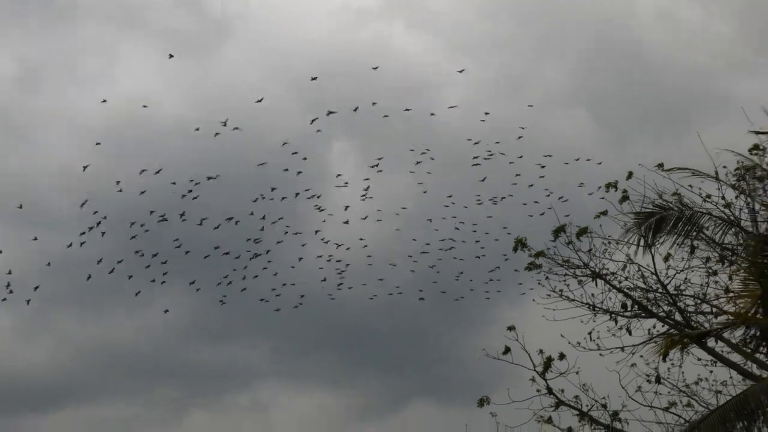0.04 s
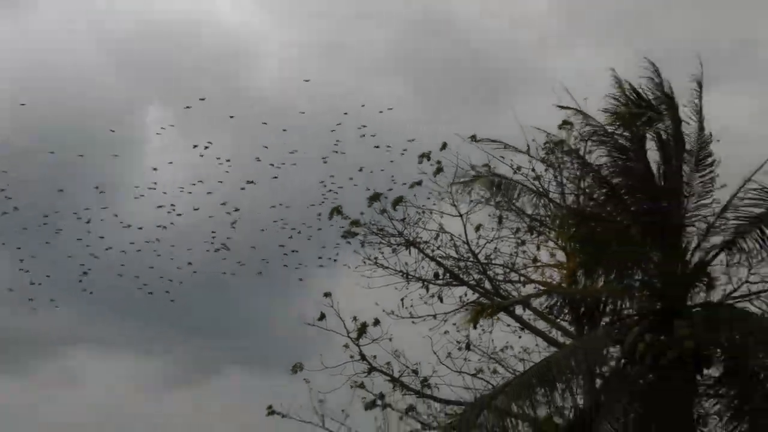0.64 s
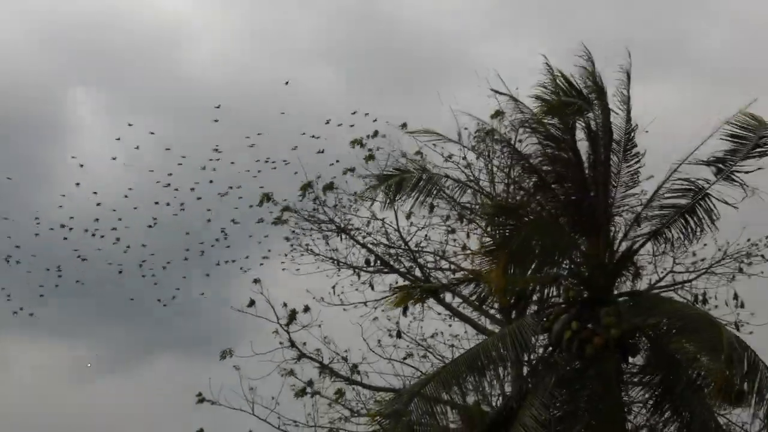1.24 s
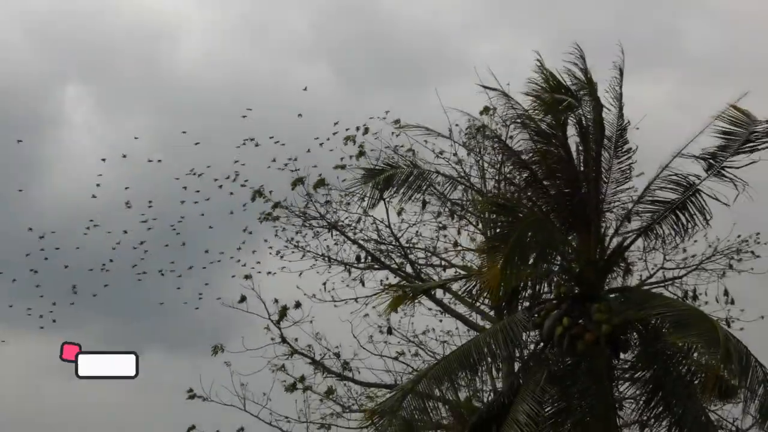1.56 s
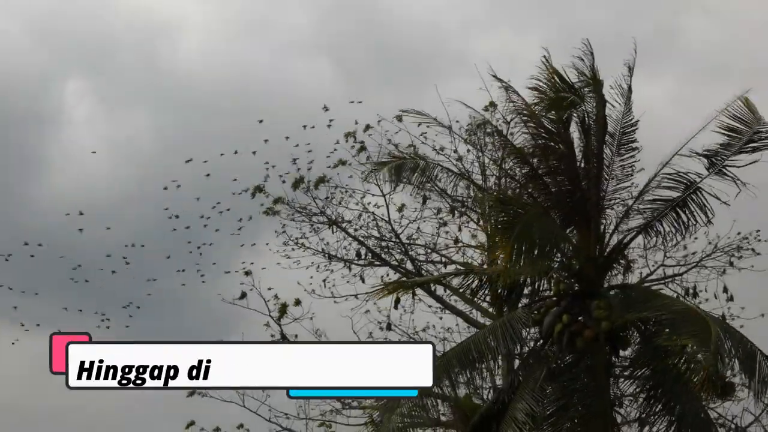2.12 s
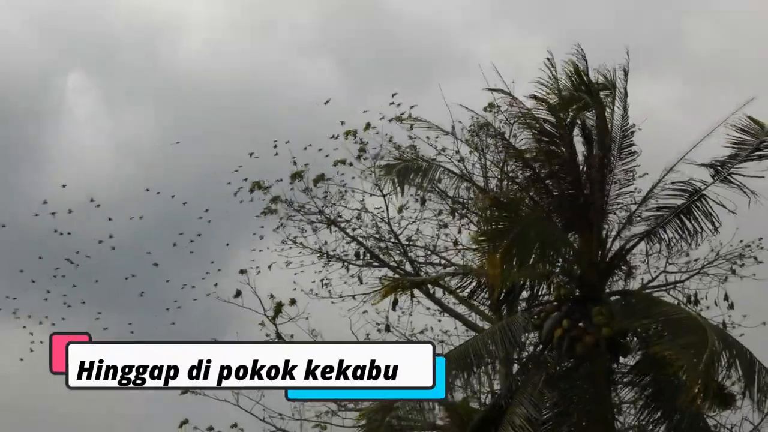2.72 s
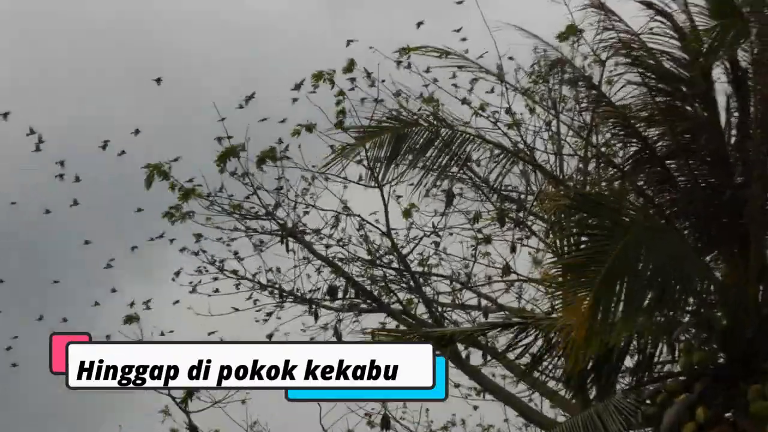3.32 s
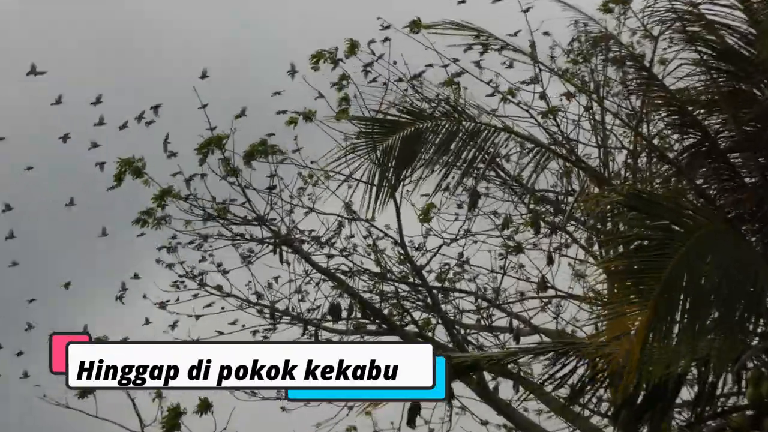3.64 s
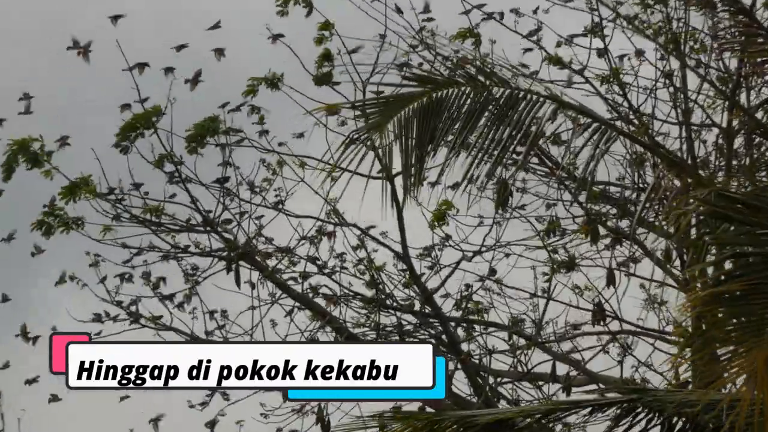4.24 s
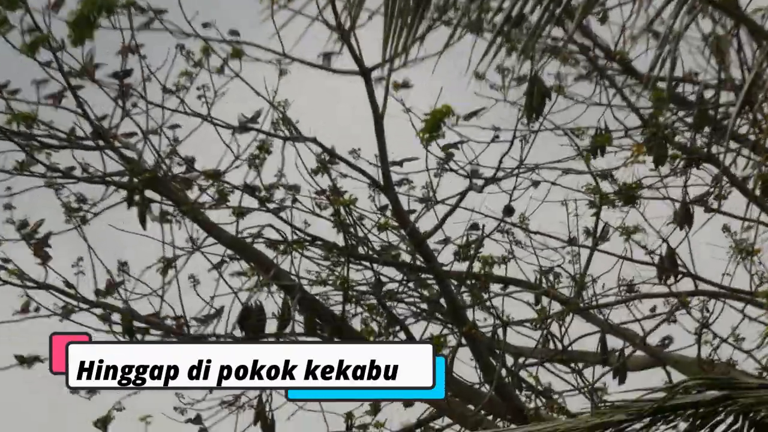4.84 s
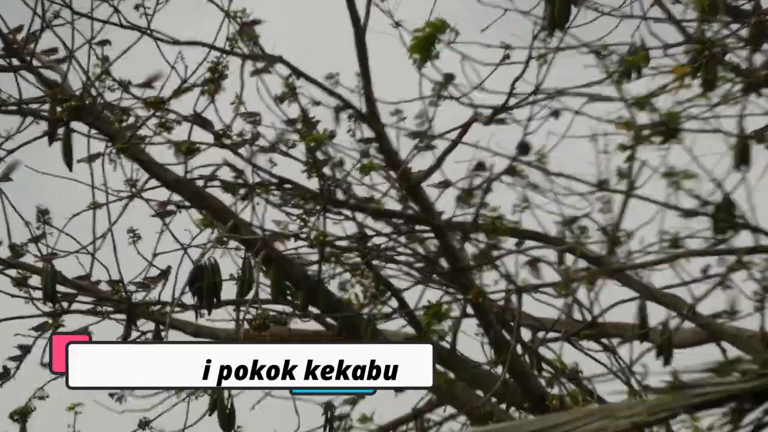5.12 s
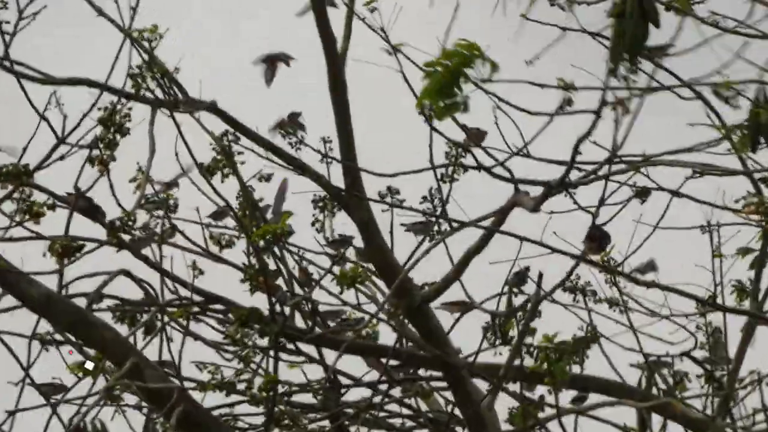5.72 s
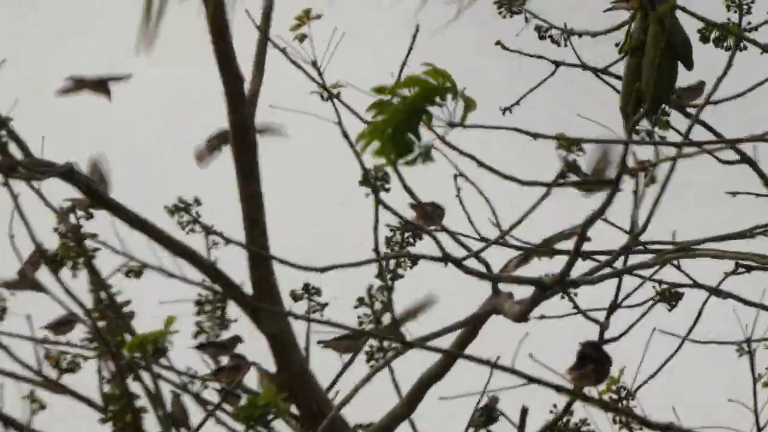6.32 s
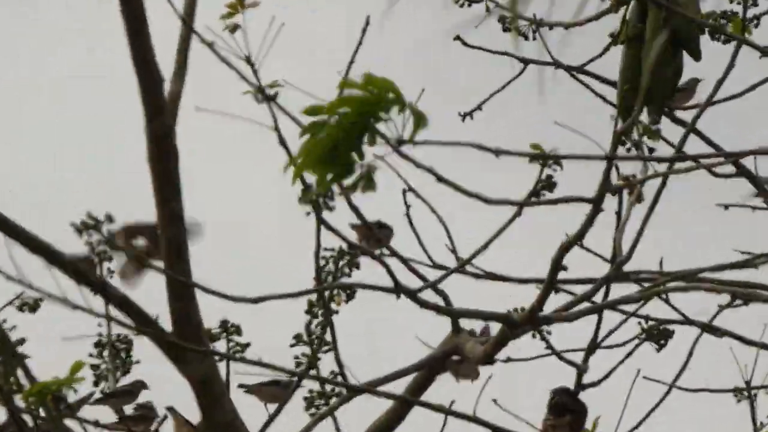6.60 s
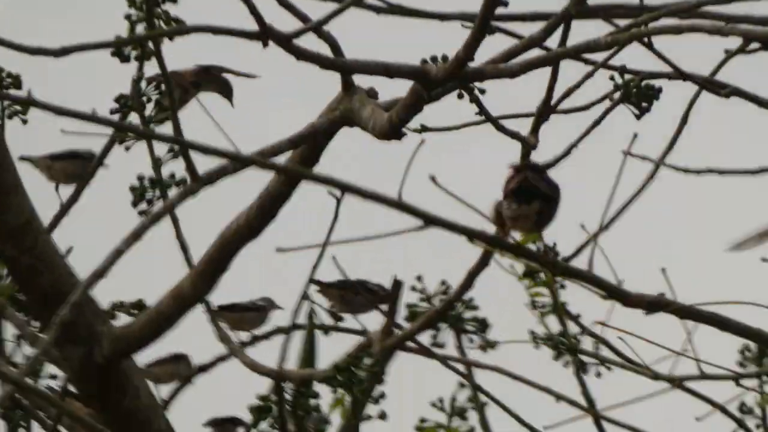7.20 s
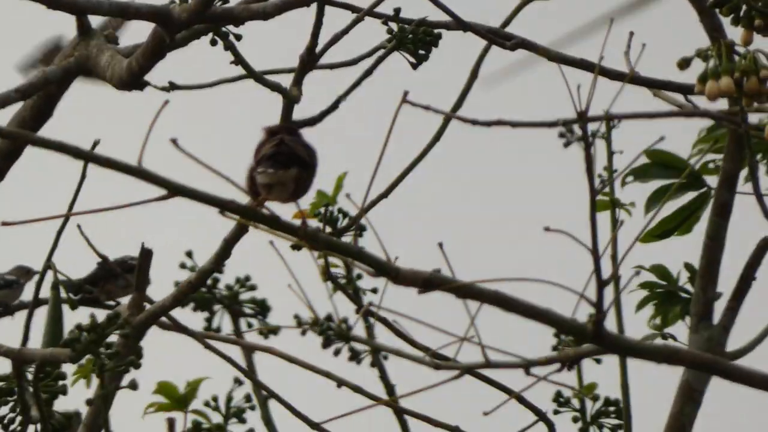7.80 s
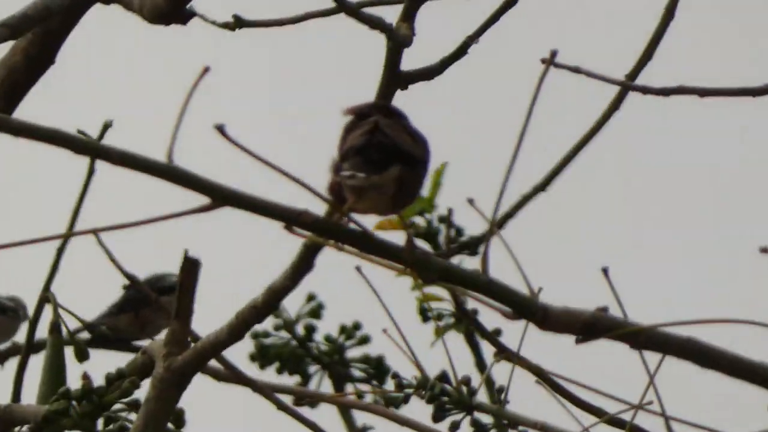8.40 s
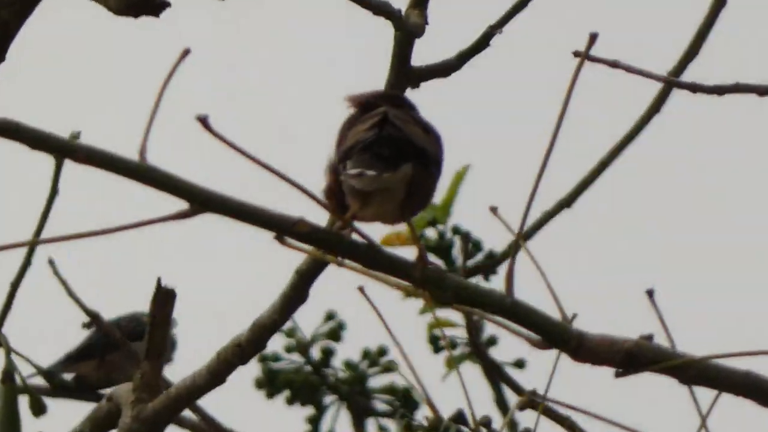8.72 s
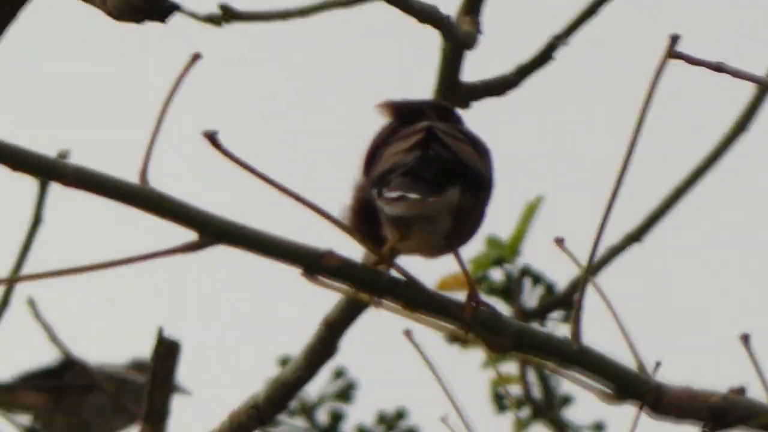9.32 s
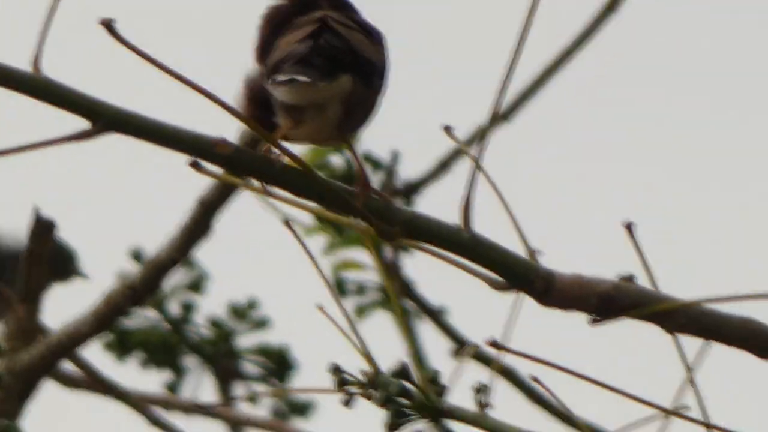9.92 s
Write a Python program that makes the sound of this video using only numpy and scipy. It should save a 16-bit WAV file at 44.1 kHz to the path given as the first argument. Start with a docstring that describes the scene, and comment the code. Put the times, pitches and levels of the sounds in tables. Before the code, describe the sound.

Gusty wind thumps on the microphone while a flock of small birds chatters in a tree, and a zoom motor whirs and ticks.

```python
"""Flock in a windy tree

Small birds settle in a tall tree on a gusty day, heard from below on a zooming camera's stereo microphone.
Crowns roar and leaves hiss; hundreds of birds chatter in gliding whistles, a few of them close.
Eddies thump on the diaphragm and duck the recorder's gain. The lens motor whirs and ticks,
and the stereo image narrows as it zooms in."""
import sys
import numpy as np
from scipy import signal
from scipy.fft import rfft, irfft, next_fast_len
from scipy.io import wavfile
from scipy.ndimage import uniform_filter1d

SR = 44100
rng = np.random.default_rng(int(sys.argv[2]) if len(sys.argv) > 2 else 0)


def dump_mix(stems):
    """Bounce the given channels to the path in sys.argv[1] as a 16-bit WAV at rate SR."""
    frames = np.atleast_2d(stems).T  # one column per channel
    limited = np.clip(frames, -1, 1)  # hard clip at full scale
    pcm = np.round(limited * 32767).astype(np.int16)
    wavfile.write(sys.argv[1], SR, pcm)


N = 438794
TIME = np.arange(N) / SR


def gain_of(db):
    """Decibels to amplitude."""
    return 10 ** (np.asarray(db) / 20)


def unit_rms(x):
    """Scales to rms 1."""
    return x / np.sqrt(np.mean(x ** 2) + 1e-20)


def steadied(x, size):
    """Removes swells slower than `size` samples."""
    return x / np.sqrt(uniform_filter1d(x ** 2, size) + 1e-6)


def curve(rows):
    """Rows of (time [s], value), read at every sample."""
    return np.interp(TIME, *np.transpose(rows))


def coloured(x, points):
    """Filters x by rows of (frequency [Hz], gain [dB])."""
    hz, db = np.transpose(points)
    size = next_fast_len(N)
    bins = np.fft.rfftfreq(size, 1 / SR)
    response = gain_of(np.interp(np.log(bins + 1), np.log(hz), db))
    return irfft(rfft(x, size) * response, size)[:N]


def noise(points):
    """Steady noise of rms 1 with the given spectrum."""
    return unit_rms(coloured(rng.standard_normal(N), points))


def wander(rate, size=N):
    """A random drift of rms about 1 that turns `rate` times a second."""
    knots = rng.standard_normal(size // 16 + 8)
    return np.interp(np.arange(size) * rate / SR, np.arange(len(knots)), knots) * np.sqrt(3 / 2)


def burst(length, rise_s, fall_s):
    """An envelope that swells, holds and dies away."""
    t = np.arange(0, length + 8 * fall_s, 1 / SR)
    return np.minimum(t / rise_s, 1) * np.exp(-np.maximum(t - length, 0) / fall_s)


def add(mix, start, sound):
    """Mixes a sound in at `start` seconds."""
    part = mix[max(round(start * SR), 0):][:len(sound)]
    part += sound[:len(part)]


def echoes(x, t60):
    """Scatter from trunks and branches: a short random tail of energy 1."""
    t = np.arange(SR // 2) / SR
    tail = rng.standard_normal(len(t)) * gain_of(-60 * t / t60) * (t > .006)
    return signal.oaconvolve(x, tail / np.linalg.norm(tail))[:N]


# the microphone's side signal as the lens zooms in: (time [s], gain [dB])
SIDE_GAIN = [(0, -0.5), (3, 1.5), (5, -2), (6.3, -3.5), (7.3, -10.5)]
# the part of the side that narrows, and the treble that stays wide: (frequency [Hz], gain [dB])
NARROWING_BAND = [(60, -17), (150, -14.5), (400, -8.5), (1500, -5.5), (3200, -11.5)]
WIDE_TREBLE = [(3500, -63), (6000, -30), (9500, -10.5), (13000, -3)]

def stereo(mid, side):
    """The zoom microphone lets in less of the side as the lens closes in; the top stays wide."""
    side = coloured(side, NARROWING_BAND) * gain_of(curve(SIDE_GAIN)) + coloured(side, WIDE_TREBLE)
    return np.array([mid + side, mid - side])


# wind in the crowns, high overhead: (frequency [Hz], level [dB])
ROAR_SPECTRUM = [(20, -67), (60, -4), (130, 6), (220, 2), (330, 5.5), (520, -1.5), (700, -1.5),
                 (1050, -5.5), (1500, -5.5), (2500, -7), (3200, -12.5), (6000, -50)]
# its midrange at the microphone: (time [s], level [dB])
ROAR_LEVEL = [(0, -36), (0.55, -37.5), (0.75, -34.5), (1.15, -34.5), (1.4, -39), (1.8, -40), (2.0, -37.5),
              (2.5, -41), (3.3, -39.5), (5.05, -39.5), (5.5, -45.5), (5.95, -50), (7.4, -52), (8.85, -39),
              (9.95, -38.5)]
# a palm frond caught by one gust: (time [s], depth [0-1])
FROND_RATTLE = [(.7, 0.36), (.85, 0.8), (1.15, 0.7), (1.25, 0)]

def crowns(lull_db=-44, rattle_hz=65):
    """Wind roars through the crowns, duller in the lulls; a flapping frond chops it into a rattle."""
    roar, level_db = noise(ROAR_SPECTRUM), curve(ROAR_LEVEL)
    midrange = signal.butter(4, [700, 1500], "band", fs=SR, output="sos")
    swirl_db = 2.5 * np.tanh(wander(30))
    roar = roar / np.std(signal.sosfilt(midrange, roar)) * gain_of(level_db - 1 + swirl_db)
    brightness = gain_of(np.minimum(level_db - lull_db, 0))
    roar -= (1 - brightness) * coloured(roar, [(700, -38), (1300, -0.5)])
    flaps = np.cos(2 * np.pi * np.cumsum(rattle_hz * (1 + 0.179 * wander(25.15))) / SR)
    frond = coloured(roar, [(400, -22), (600, 14.5), (950, 4), (1400, -12)])
    return roar + curve(FROND_RATTLE) * flaps * frond


# foliage overhead: (frequency [Hz], level [dB])
LEAF_SPECTRUM = [(800, -58), (2200, -11), (3000, -2.5), (4200, 4), (5300, 1.5), (6300, -2.5), (7900, -12),
                 (9000, -8.3), (10100, -7.5), (11500, -15), (15300, -28)]
# its hiss at the microphone: (time [s], level [dB])
LEAF_LEVEL = [(0, -40), (0.2, -37), (0.5, -42.5), (1.15, -39.5), (1.7, -44.5), (2.0, -40.5), (2.5, -43.5),
              (5.0, -41), (5.9, -47.5), (7.2, -48.5), (7.8, -43), (8.8, -36), (9.95, -36)]

def leaves(snaps_per_s=900):
    """Leaves hiss and patter against each other in tiny snaps."""
    sizes = gain_of(14 * np.minimum(rng.exponential(1, N), 3.5))
    snaps = (rng.random(N) < snaps_per_s / SR) * rng.choice([-1, 1], N) * sizes
    hiss = noise(LEAF_SPECTRUM) + gain_of(-10) * unit_rms(coloured(snaps, LEAF_SPECTRUM))
    return hiss * gain_of(curve(LEAF_LEVEL) + 4 + 0.9 * wander(40))


# brief swells of broad background hiss: (start [s], length [s], level [dB])
HISS_SWELLS = [(2.632, 0.086, -33.5), (5.612, 0.14, -46), (6.17, 0.1, -44), (6.38, 0.15, -41.5),
               (6.76, 0.086, -41.5), (9.43, 0.049, -33.5)]
# their colour: (frequency [Hz], level [dB])
SWELL_SPECTRUM = [(250, -22), (420, -7), (1400, 2.5), (2300, 0.5), (3200, 4.5), (5000, -0.5), (8000, -14.5),
                  (10000, -10), (15000, -33)]

def hiss_swells():
    """Short swells of broad hiss that start crisply and flutter."""
    envelope = np.zeros(N)
    for start, length, db in HISS_SWELLS:
        add(envelope, start, gain_of(db) * burst(length, rise_s=0.0072, fall_s=0.021))
    return envelope * noise(SWELL_SPECTRUM) * gain_of(2 * wander(60))


# the lens motor, right beside the microphone: (frequency [Hz], level [dB])
WHIR_SPECTRUM = [(360, -9), (415, 14.5), (480, -20), (1450, -22), (1700, 3.5), (1790, 5), (2050, -25)]
# its run: (time [s], level [dB])
WHIR_LEVEL = [(2.6, -69), (2.9, -46), (5.2, -52), (5.9, -59), (6.4, -45.5), (7.3, -58.5), (7.8, -48),
              (8.4, -46)]
# its single steps: (time [s], level [dB])
LENS_TICKS = [(7.885, -27), (7.92, -28), (7.95, -26.5), (7.9902, -24), (8.0167, -26), (8.1993, -25),
              (8.2387, -25), (8.4622, -22.5), (8.601, -21.5), (8.728, -19), (8.866, -22), (8.996, -22),
              (9.133, -21.5), (9.2624, -22), (9.4727, -17.5), (9.543, -24), (9.6617, -21), (9.7337, -20.5),
              (9.796, -21), (9.935, -21)]

def lens_motor(tick_hz=1735, rise_s=0.0033, ring_s=0.04):
    """The motor whirs, then steps in ticks, each a short note with a dull clack."""
    out = noise(WHIR_SPECTRUM) * gain_of(curve(WHIR_LEVEL) + 3.3 * wander(15))
    t = np.arange(SR // 8) / SR
    swell = (t / rise_s * np.exp(1 - t / rise_s)) ** 2
    ring = gain_of(-16) * np.minimum(t / rise_s, 1) * np.exp(-t / ring_s)
    for start, db in LENS_TICKS:
        rattle = ring * wander(106, size=len(t))  # the gears rattle on faintly, on the same note
        hz = tick_hz * (1 + .01 * rng.standard_normal())
        note = (swell + rattle) * np.sin(2 * np.pi * hz * t)
        clack = swell * unit_rms(uniform_filter1d(rng.standard_normal(len(t)), size=9))
        add(out, start, gain_of(db - 4.8) * (note + gain_of(-15) * clack))
    return out


# handling noise on the camera: (time [s], level [dB], fade [s], pitch [Hz])
KNOCKS = [(1.148, -23, 0.0055, 4030), (2.715, -29, 0.014, 3060), (5.308, -19, 0.005, 7500),
          (5.308, -22.5, 0.012, 740), (5.384, -27.5, 0.0076, 5900), (5.63, -28.5, 0.014, 900),
          (7.655, -26, 0.004, 6300), (9.477, -21, 0.003, 1200), (9.74, -16.5, 0.015, 625),
          (9.741, -16.5, 0.0086, 4370)]

def handling():
    """The hand knocks and creaks on the body: bands of noise that die quickly."""
    out, t = np.zeros(N), np.arange(SR // 8) / SR
    for start, db, fade, hz in KNOCKS:
        body = signal.butter(2, [hz / 2.74, min(hz * 1.04, SR / 2.1)], "band", fs=SR, output="sos")
        knock = unit_rms(signal.sosfilt(body, rng.standard_normal(len(t))))
        add(out, start, gain_of(db) * knock * np.exp(-t / fade))
    return out


def eddy(hz, cycles):
    """One eddy pushes the diaphragm to and fro; 50 ms long, strongest in the middle."""
    t = np.arange(-SR // 40, SR // 40) / SR
    push = np.cos(2 * np.pi * (hz * t + rng.random()))
    return push / np.cosh(t * hz / cycles) * signal.windows.tukey(len(t))


# gusts straight on the microphone: (start [s], length [s], level [dB], typical eddy pitch [Hz])
GUSTS = [(0.038, 0.18, -19, 164), (0.281, 0.033, -10, 223), (0.338, 0.18, -16, 231),
         (0.809, 0.11, -17, 217), (0.991, 0.024, -13, 190), (1.09, 0.19, -17.5, 170),
         (1.264, 0.24, -14, 230), (1.513, 0.15, -14, 236), (1.964, 0.1, -15.5, 163),
         (2.083, 0.042, -8.5, 232), (2.892, 0.089, -14, 200), (3.293, 0.042, -22, 185),
         (3.613, 0.055, -14.5, 176), (3.694, 0.27, -25, 189), (4.086, 0.12, -16.5, 177),
         (4.358, 0.19, -20.5, 186), (5.058, 0.055, -16, 196), (5.167, 0.062, -16.5, 242),
         (5.49, 0.13, -21.5, 204), (5.764, 0.097, -17.5, 245), (6.037, 0.025, -18.5, 188),
         (6.124, 0.019, -16, 198), (6.232, 0.067, -24, 231), (6.381, 0.17, -23, 220),
         (6.573, 0.086, -23.5, 233), (6.825, 0.023, -19, 183)]
# the lighter flow between them: (time [s], level [dB])
BREEZE = [(0, -33), (0.45, -15), (0.6, -37), (0.78, -25), (1.75, -25), (1.87, -42), (2.5, -58), (2.8, -37),
          (3.02, -17), (3.17, -39.5), (4.3, -24), (4.8, -39.5), (5.6, -24.5), (6.5, -29.5), (7.1, -35.5),
          (7.5, -36), (7.9, -51), (9.9, -64)]
# the rumble under the eddies: (frequency [Hz], level [dB])
RUMBLE_SPECTRUM = [(35, -67), (62, -6), (90, -3.5), (130, 5), (190, -1.5), (270, -7), (420, -7), (580, -36),
                   (2000, -77)]

def buffeting(level_db, edge_db, pitch_ratio=0.98, count=2600):
    """Eddies of many sizes rock the diaphragm; harder gusts add a brighter, rougher edge."""
    power = gain_of(curve(BREEZE)) ** 2
    for start, length, db, _ in GUSTS:
        add(power, start, (gain_of(db) * burst(length, rise_s=0.014, fall_s=0.027)) ** 2)
    force = np.sqrt(power)
    eddy_hz = pitch_ratio * curve([(start + length / 2, hz) for start, length, _, hz in GUSTS])
    flow = np.zeros(N)
    for when, pitch, strength in zip(rng.integers(0, N, count), *rng.standard_normal((2, count))):
        speed = np.clip(10 * force[when], .2, 2) ** 0.074  # faster air, quicker eddies
        hz = eddy_hz[when] * speed * 2 ** (0.48 * np.clip(pitch, -2, 2))
        add(flow, when / SR, gain_of(5 * min(strength, 2)) * eddy(hz, cycles=0.67))
    flow = coloured(flow, [(50, -16.0), (110, 2.0)])
    flow = steadied(unit_rms(flow) + 0.26 * noise(RUMBLE_SPECTRUM), size=2200)
    flow *= gain_of(1 - 7 * np.maximum(wander(55) - .3, 0))  # the flow stalls, so gusts sputter
    stir = np.sqrt(uniform_filter1d(flow ** 2, 400) + 1e-6)  # the edge flares with each eddy
    edge = stir * noise([(200, -45), (450, 4.0), (650, -8), (1000, -14.5), (2500, -56)])
    return gain_of(level_db) * force * flow + gain_of(edge_db) * force ** 1.62 * edge


# the strongest eddies on the diaphragm: (time [s], level [dB], pitch [Hz])
BIG_EDDIES = [(0.05, -6, 183), (0.131, -8, 201), (0.306, 1, 258), (0.339, -12, 480), (0.427, 3.5, 186),
              (0.494, 2, 354), (0.56, -5.5, 240), (0.855, -1.5, 166), (1.181, -5, 178), (1.243, -1, 202),
              (1.296, 4, 308), (1.435, -4.5, 166), (1.609, 5, 302), (1.654, -1.5, 432), (2.054, 0.5, 237),
              (2.106, 6.5, 241), (2.117, 5, 286), (2.133, 3, 258), (2.925, 0, 191), (3.49, -12, 181),
              (3.877, -7, 228), (4.418, -11, 188), (5.087, -1, 221), (5.431, -4.5, 196), (5.534, -7.5, 243),
              (5.868, -11, 410), (6.077, -9, 197), (6.223, -9, 169), (6.305, -7, 237), (6.456, -9, 187),
              (7.203, -10, 195)]

def thumps():
    """The largest eddies stand out as single thumps."""
    out = np.zeros(N)
    for when, db, hz in BIG_EDDIES:
        add(out, when - .022, gain_of(db + 1) * eddy(hz, cycles=0.38))
    return coloured(out, [(30, -28), (100, -1.0)])


# extra wind on the microphone's right port: (time [s], level [dB])
WINDWARD = [(2.3, 1.5), (2.8, -17)]

def microphone_wind(lean=.17):
    """Wind on both ports; the first gusts come from the right and shake that one harder."""
    blows, windward = thumps(), gain_of(curve(WINDWARD))
    mid = buffeting(level_db=0.27, edge_db=-12.5) + blows
    side = buffeting(level_db=-2, edge_db=-1)  # the smallest eddies differ most between the ports
    wind = stereo(mid, side)
    wind[1] += windward * buffeting(level_db=-4.5, edge_db=-5, pitch_ratio=1.39)
    return wind + lean * windward * np.array([-blows, blows])


def chirp(length, first_hz, middle_hz, last_hz, rasp):
    """One syllable: a gliding whistle, made raspy by a fast shake of the syrinx."""
    progress = np.linspace(0, 1, max(int(length * SR), 64))
    size = len(progress)
    hz = np.polyval(np.polyfit([0, .5, 1], [first_hz, middle_hz, last_hz], 2), progress)
    hz *= 1 + 0.112 * rasp * wander(692, size)
    shake = gain_of(10 * rasp * np.tanh(wander(303, size)))
    return unit_rms(np.sin(2 * np.pi * np.cumsum(hz) / SR) * shake * signal.windows.tukey(size, .7))


# the whole flock, heard from the ground: (time [s], level [dB])
CHATTER_LEVEL = [(0, -33), (0.55, -38.5), (1.1, -35), (1.65, -40.5), (2.0, -39), (2.58, -40), (2.78, -39),
                 (2.92, -28), (3.08, -30), (3.55, -30.5), (4.08, -27), (4.25, -34.5), (4.48, -27.5),
                 (5.07, -26.5), (5.5, -37), (7.6, -43), (8.25, -33), (9.22, -29.5), (9.3, -33.5),
                 (9.45, -28.5), (9.95, -33)]
# the farthest birds, merged into a blur: (time [s], share of the chatter's power [0-1])
BLUR_SHARE = [(2, .2), (2.9, .44), (5.2, .5), (7.3, .75), (8.3, .35)]
# that blur's colour: (frequency [Hz], level [dB])
BLUR_SPECTRUM = [(1000, -37), (2400, -2), (2800, 5.5), (3050, 2.5), (3400, 2), (3900, -6.5), (4300, -5),
                 (4800, -37), (9000, -53)]

def flock(count=2200, kinds=400, glide=0.06):
    """Many short chirps from all distances over the blur of the farthest birds."""
    repertoire, birds = [], np.zeros(N)
    for length, pitch, rasp, onset, end in zip(*rng.random((3, kinds)), *rng.standard_normal((2, kinds))):
        hz = 2780 * 1.37 ** (pitch ** 1.3)
        first_hz, last_hz = hz * (1 + glide * onset), hz * (1 + glide * end)
        repertoire.append(chirp(0.014 + 0.032 * length, first_hz, hz, last_hz, 0.35 * rasp))
    calls = zip(rng.random(count), rng.integers(0, kinds, count), rng.standard_normal(count))
    for when, kind, nearness in calls:
        add(birds, when * N / SR, gain_of(4.8 * min(nearness, 2)) * repertoire[kind])
    birds = coloured(birds, [(2500, 5), (2850, 1.0), (3400, 1.0), (3800, 5.0), (4500, 4)])
    birds = steadied(birds + gain_of(-8) * echoes(birds, t60=0.35), size=4500)
    blur = curve(BLUR_SHARE)
    chatter = np.sqrt(1 - blur) * birds + np.sqrt(blur) * noise(BLUR_SPECTRUM)
    return gain_of(curve(CHATTER_LEVEL)) * chatter


# the midrange turns hollow while the lens travels fast: (frequency [Hz], gain [dB])
HOLLOW_COLOUR = [(1100, 1.5), (1300, -3), (1410, 2), (1560, -10.5), (1760, 2), (1900, -6), (2100, -2),
                 (2520, -8), (2750, -3.5), (4050, -4.5), (4400, 1), (4680, -5.5), (5150, 1)]
# how hollow: (time [s], depth [times that colour])
HOLLOW_DEPTH = [(2.25, 0), (2.45, 1), (5.1, 1), (5.9, 1.1), (7.8, .5), (8.5, 0)]
# the background drops away briefly at a few moments: (start [s], length [s], depth [dB])
DIPS = [(1.305, 0.02, -3.5), (2.125, .045, -4.5), (5.786, .1, -3), (6.058, .028, -5)]

def surroundings():
    """Trees and flock together, hollow for a while and dipping briefly, with swells of hiss on top."""
    hz, t, spectra = signal.stft(crowns() + leaves() + flock(), SR, nperseg=1024)
    colour_db = np.interp(hz, *np.transpose(HOLLOW_COLOUR))
    depth = np.interp(t, *np.transpose(HOLLOW_DEPTH))
    hollowed = signal.istft(spectra * gain_of(np.outer(colour_db, depth)), SR)[1][:N]
    dip_db = np.zeros(N)
    for start, length, db in DIPS:
        add(dip_db, start, db * burst(length, rise_s=.005, fall_s=0.024))
    return hollowed * gain_of(dip_db) + hiss_swells()


# smaller birds high in the tree: (time [s], level against the flock [dB])
TWITTER_LEVEL = [(5.3, -19), (7.2, -13), (7.8, -8), (8.9, -11.5)]

def twitter(count, first_hz, glide):
    """Short whistled slurs; `glide` is the last pitch over the first."""
    out = np.zeros(N)
    for when, length, pitch, nearness in zip(*rng.random((2, count)), *rng.standard_normal((2, count))):
        hz = first_hz * (1 + .08 * pitch)
        slur = chirp(0.0248 + 0.0408 * length, hz, hz * glide ** .5, hz * glide, rasp=0.18)
        add(out, when * N / SR, gain_of(2 * nearness) * slur)
    level = gain_of(curve(CHATTER_LEVEL) + curve(TWITTER_LEVEL))
    return level * unit_rms(out + .5 * echoes(out, t60=0.29))


# calls from the branches nearest the microphone:
# (time [s], length [s], first pitch [Hz], middle pitch [Hz], last pitch [Hz], level [dB], rasp [0-1])
NEAR_CALLS = [ (0.125, .045, 4100, 4700, 6000, -31.5, .6), (0.188, 0.024, 4000, 3400, 3650, -23, 0.25),
              (0.217, .024, 3850, 3850, 3000, -20, .12), (0.237, 0.03, 3300, 3480, 3650, -23, 0.15),
              (0.362, 0.067, 3300, 2600, 2130, -34, 0.9), (0.43, .035, 2850, 3020, 3000, -32, .3),
              (0.831, .045, 2804, 3200, 3300, -31, 0.25), (0.88, .04, 2950, 3150, 3400, -34, .3),
              (2.05, 0.04, 3100, 3000, 3400, -32.5, 0.35), (2.118, .055, 3200, 3330, 3250, -33.5, .35),
              (2.28, 0.05, 2350, 2150, 2070, -40.5, 0.45), (3.555, .06, 3400, 3000, 3150, -30, .45),
              (3.605, .04, 3300, 3080, 3450, -27, .6), (5.261, .022, 3850, 3760, 3640, -32.5, 0.1),
              (6.886, .09, 3060, 3050, 3100, -43.5, 0.08), (7.08, 0.09, 5150, 4650, 3850, -46.5, .1),
              (7.276, .034, 2950, 3070, 3050, -42, .1), (7.626, 0.075, 3700, 3900, 4450, -37.5, .14),
              (8.23, 0.052, 3000, 2900, 3400, -26, 0.4), (8.282, 0.035, 2820, 3015, 3200, -21.5, .3),
              (8.484, .022, 4310, 4690, 4200, -31, .2), (8.516, 0.04, 2810, 2990, 3200, -31, 0.5),
              (8.565, .08, 5050, 4550, 4100, -37.5, .15), (8.68, .11, 3000, 3500, 4300, -31, .12),
              (8.7, .08, 5750, 7300, 8600, -40.5, .1), (9.19, .03, 4100, 3900, 3700, -33, .25),
              (9.215, .065, 3000, 3150, 3400, -32, .3), (9.419, 0.085, 2766, 2880, 2870, -27.5, 0.5),
              (9.645, 0.085, 3450, 3680, 3650, -29, 0.4)]
# close trills of falling slurs: (start [s], end [s], level [dB])
TRILLS = [(0.752, 0.9, -33), (6.2, 6.25, -43), (7.69, 7.83, -41), (8.905, 9.05, -35)]

def near_birds(level_db=-2, slur_every_s=0.054, slur_hz=(4560, 4460, 4000)):
    """Single birds call and trill close by; the branches scatter their sound to the sides."""
    out = np.zeros(N)
    for start, length, *pitches, db, rasp in NEAR_CALLS:
        add(out, start, gain_of(db + level_db) * chirp(length, *pitches, rasp))
    for start, end, db in TRILLS:
        for k in range(round((end - start) / slur_every_s) + 1):
            pitch, effort_db = rng.standard_normal(2)  # no two slurs are alike
            slur = chirp(0.035, *np.multiply(slur_hz, 1 + .008 * pitch), rasp=.12)
            add(out, start + k * slur_every_s, gain_of(db + level_db + effort_db) * slur)
    out *= gain_of(2 * wander(110))  # the gusty air breaks up the calls
    mid = out + gain_of(-10) * echoes(out, t60=0.16)
    return stereo(mid, side=gain_of(-2) * echoes(out, t60=0.22))


def scene():
    """Wind at the microphone, the trees and their birds, and the camera's own noises."""
    mix = microphone_wind() + stereo(surroundings(), surroundings())
    mix += twitter(count=350, first_hz=4300, glide=.87)
    mix += twitter(count=150, first_hz=3040, glide=1.17)
    return mix + near_birds() + lens_motor() + handling()


def gain_control(x, threshold_db=-20, ratio=1.77, attack_s=0.01, recovery_db_per_s=36):
    """The recorder turns everything down when a gust hits, then creeps back up."""
    keep = np.exp(-1 / (attack_s * SR))
    power_db = 10 * np.log10(signal.lfilter([1 - keep], [1, -keep], (x ** 2).mean(0)) + 1e-12)
    fall_db = TIME * recovery_db_per_s
    held_db = np.maximum.accumulate(power_db + fall_db) - fall_db
    over_db = np.maximum(held_db - threshold_db, 0)
    return x * gain_of(-(1 - 1 / ratio) * uniform_filter1d(over_db, size=200))


def record(dry):
    """Gain control, full-scale clipping, then the band limit."""
    clipped = np.clip(gain_control(dry), -1, 1)
    lowpass = signal.firwin(511, cutoff=15350, window=("kaiser", 9), fs=SR)
    return signal.oaconvolve(clipped, lowpass[None], "same", axes=1)


dry = scene()
out = record(dry)
dump_mix(out)
```